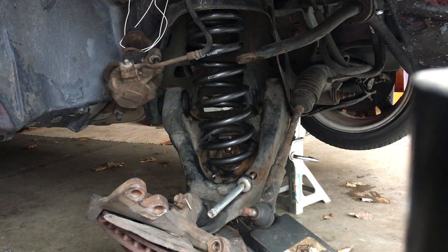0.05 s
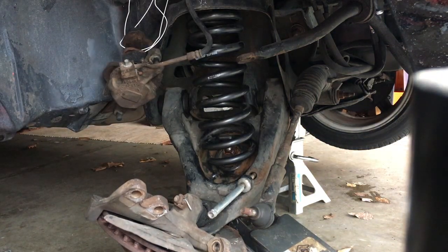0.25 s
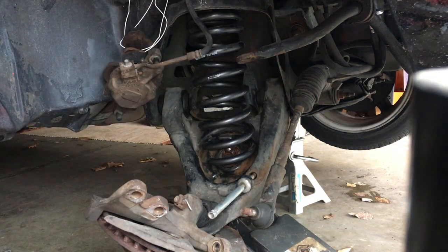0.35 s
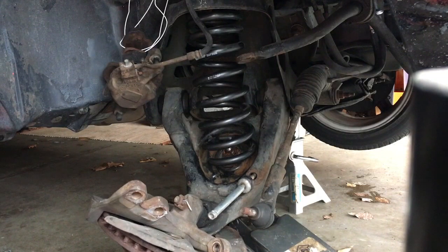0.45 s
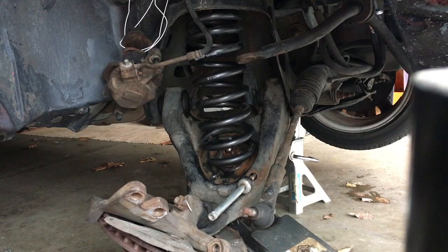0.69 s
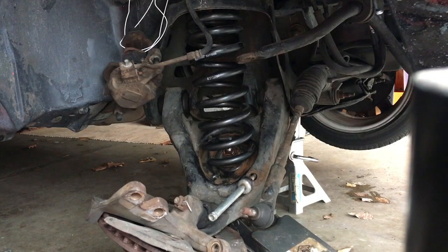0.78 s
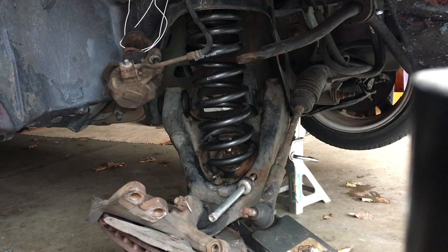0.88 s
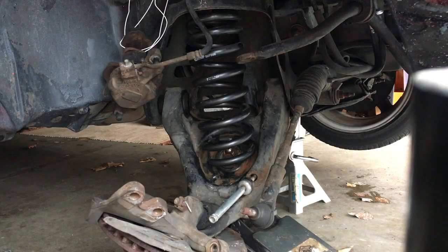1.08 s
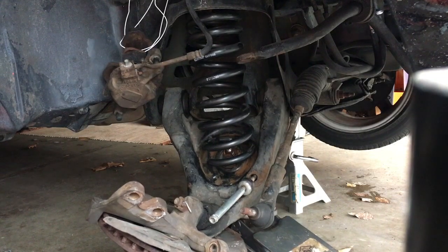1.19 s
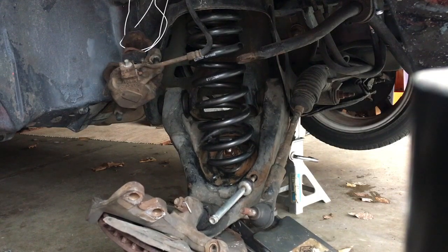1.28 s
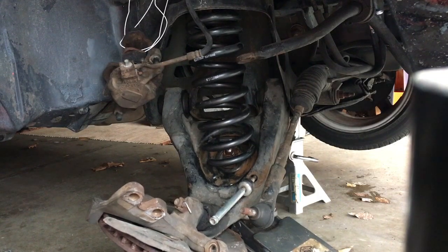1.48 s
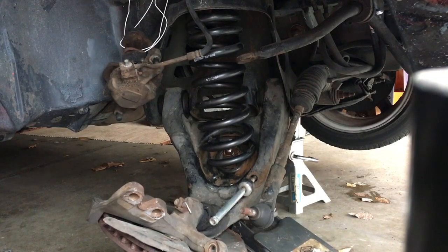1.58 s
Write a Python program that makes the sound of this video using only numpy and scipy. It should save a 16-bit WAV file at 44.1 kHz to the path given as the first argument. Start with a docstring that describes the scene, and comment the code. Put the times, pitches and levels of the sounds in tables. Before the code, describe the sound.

A steel part on a car suspension clanks sharply at about 0.15 seconds, ringing briefly in an open garage. Much softer, dull knocks follow from 1 to 1.6 seconds, the strongest near 1.2, with a faint tick near 1.4. A small bird outside gives faint rising chirps at about 0.6 and 1.25 seconds. A low motor hum and quiet room noise continue throughout.

```python
"""An open garage with a car whose suspension is under load. A steel part clanks once, ringing
from a few quick hits. Short pushes shake the suspension arm into dull knocks, and faint ticks hiss.
A small bird just outside whistles short rising chirps that echo.
A motor hums low over the steady noise of the room."""
import sys
import numpy as np
from scipy import signal
from scipy.fft import rfft, irfft, next_fast_len
from scipy.io import wavfile
from scipy.ndimage import uniform_filter1d, map_coordinates

SR = 44100
rng = np.random.default_rng(int(sys.argv[2]) if len(sys.argv) > 2 else 0)


def inscribe(sig):
    """Save sig as 16-bit PCM at rate SR to the path in sys.argv[1].

    A 1-D sig is mono; a 2-D sig holds one channel per row.
    Samples are clipped to [-1, 1] before scaling.
    """
    pcm = np.round(np.clip(np.atleast_2d(sig).T, -1, 1) * 32767)
    wavfile.write(sys.argv[1], SR, pcm.astype(np.int16))


N = 72765


def amp(db):
    """Turn decibels into a gain."""
    return 10 ** (np.asarray(db) / 20)


def unit(x):
    """Scale a signal to an average (rms) level of 1."""
    return x / np.sqrt(np.mean(x ** 2) + 1e-20)


def along(points, hz):
    """Read a curve of (pitch_hz, value) points at hz, on a log scale."""
    pitches, values = np.transpose(points)
    return np.interp(np.log(hz + 1), np.log(pitches + 1), values)


def wobble(rate):
    """A smooth curve through `rate` random points a second."""
    return map_coordinates(rng.standard_normal(int(N * rate / SR) + 4), [np.arange(N) * rate / SR])


def filtered(x, response):
    """Filter x with the gain that response gives for each frequency."""
    size = next_fast_len(len(x) + SR // 2)
    return irfft(rfft(x, size) * response(np.fft.rfftfreq(size, 1 / SR)), size)[:len(x)]


def add(track, start_s, sound):
    """Mix a sound into the track."""
    start = round(start_s * SR)
    track[start:start + len(sound)] += sound[:len(track) - start]


def burst(fade_s, response):
    """Filtered noise that starts at once. Here and below, fade_s is the time to fall by 60 dB."""
    t = np.arange(SR // 2) / SR
    return unit(filtered(rng.standard_normal(len(t)), response)) * amp(-60 * t / fade_s)


def echo_tail(fades):
    """A wash of echoes: noise that dies away as the (pitch_hz, fade_s) points say."""
    hz, t, spectrum = signal.stft(rng.standard_normal(SR), SR, nperseg=256)
    tail = signal.istft(spectrum * amp(-60 * t / along(fades, hz)[:, None]), SR, nperseg=256)[1]
    return tail / np.linalg.norm(tail)


def bird():
    """A rising whistle with a weak overtone, smeared by near and far echoes."""
    # the shape of one chirp: share_of_length, pitch_hz, level_db
    chirp_shape = [(0, 5490, -19.5), (.12, 6460, -6), (0.349, 7000, -1), (.62, 7460, -2.5), (.8, 8060, -4),
                   (0.999, 9000, -18.5)]
    # the calls: start_s, level_db, length_s, direct_db, first_third_db
    calls = [(-0.05, -51, 0.045, -3, -0.5), (0.611, -42, 0.042, 2, -0.5), (1.246, -45, .05, -6.5, -1.5)]
    share, pitch_hz, shape_db = np.transpose(chirp_shape)
    lead = SR // 10  # room for the call that begins before time zero
    out = np.zeros(N + lead)
    for start_s, level_db, length_s, direct_db, first_third_db in calls:
        progress = np.linspace(0, 1, round(length_s * SR))
        phase = 2 * np.pi * np.cumsum(np.interp(progress, share, pitch_hz)) / SR
        whistle = np.sin(phase) + amp(-11.5 - 89.5 * progress) * np.sin(2 * phase)
        opening_db = first_third_db * np.clip((0.33 - progress) * 20, 0, 1)
        loudness = amp(level_db + opening_db + np.interp(progress, share, shape_db))
        call = loudness * signal.windows.tukey(len(progress), 0.1) * whistle
        far = amp(-1.5) * echo_tail([(1000, 0.42)])
        near = amp(0.5) * echo_tail([(1000, 0.15)])
        at_s = start_s + lead / SR
        add(out, at_s, amp(direct_db) * call)
        add(out, at_s + 0.0032, signal.fftconvolve(call, far + near))
    return out[lead:]


def motor_hum():
    """A motor hums a few low, slightly unsteady tones."""
    # the motor's tones: pitch_hz, level_db
    tones = [(91.5, -58), (118.4, -62.5), (150.7, -67), (209.9, -76.5), (339.1, -78), (484.5, -82)]
    waver_db, waver_radians, wavers_per_s = 2.5, 0.3, 4.9
    out, t = np.zeros(N), np.arange(N) / SR
    for pitch_hz, level_db in tones:
        loudness = np.sqrt(2) * amp(level_db + waver_db * wobble(wavers_per_s))
        phase = 2 * np.pi * (pitch_hz * t + rng.random())
        out += loudness * np.sin(phase + waver_radians * wobble(wavers_per_s))
    return out


def room_noise():
    """A soft, deep rush with random louder and quieter patches."""
    # the tone colour of the room's noise: pitch_hz, level_db
    colour = [(15, -57), (25, -18), (50, -3.5), (70, -1.5), (97, -6), (180, -16.5), (252, -19.5),
              (392, -24.5), (443, -17.5), (609, -26), (925, -24), (1590, -28), (1890, -36), (4000, -40),
              (8870, -46), (10500, -48.5), (13500, -47.5)]
    level_db, patch_db = -58.5, 2
    spectrum = signal.stft(rng.standard_normal(N + 512), nperseg=512)[2]
    patches = uniform_filter1d(rng.standard_normal(spectrum.shape), 6, axis=0)  # smooth over pitch
    patches = uniform_filter1d(patches, 14, axis=1)  # and over time
    noise = signal.istft(spectrum * amp(patch_db * unit(patches)), nperseg=512)[1][:N]
    return amp(level_db) * unit(filtered(noise, lambda hz: amp(along(colour, hz))))


def arm_knocks():
    """Short, rough pushes make the arm ring, each in its own range of pitch."""
    # the pushes on the arm: start_s, peak_db, fade_s, centre_hz, spread_octaves
    pushes = [(0.113, -48.5, 0.068, 1680, 0.62), (0.952, -50, 0.034, 1116, 0.26),
              (0.955, -48, 0.046, 284, 0.85), (1.02, -65, 0.031, 2500, 0.66),
              (1.1932, -35, 0.042, 690, 2.36), (1.205, -46, 0.12, 3000, 1.14),
              (1.223, -52, 0.15, 1480, 0.87), (1.3, -47, 0.12, 647, 1.68),
              (1.598, -55.5, 0.085, 1230, 0.73)]
    # the tones the arm rings with: pitch_hz, width_hz, level_db
    arm_tones = [(240, 60, -5.5), (630, 77, 2), (907, 66, -5), (1056, 195, -7.5), (1630, 117, -3),
                 (1965, 110, -8.5), (2500, 340, -12), (3080, 200, -11.5), (3690, 270, -13),
                 (5000, 600, -22), (7000, 350, -8.5), (12100, 4000, -25.5)]
    rise_s, snap_db = 0.0017, 12
    out, t = np.zeros(N), np.arange(SR // 2) / SR

    def arm(hz):
        """How the arm answers a shake at each frequency."""
        return sum((-1) ** k * amp(db) * 1j * hz * width / (pitch ** 2 - hz ** 2 + 1j * hz * width)
                   for k, (pitch, width, db) in enumerate(arm_tones))

    for start_s, peak_db, fade_s, centre_hz, spread_octaves in pushes:
        rough = burst(fade_s, np.ones_like) * (1 - np.exp(-t / rise_s))
        snap = amp(snap_db) * (t == 0)
        band = lambda hz: np.exp(-(np.log2((hz + 1) / centre_hz) / spread_octaves) ** 2 / 2)
        knock = filtered(rough + snap, lambda hz: arm(hz) * band(hz))
        add(out, start_s, amp(peak_db) * knock / np.abs(knock).max())
    return out


def steel_clank():
    """Quick hits blur into one clank; each rings the steel again and adds a noisy crack."""
    # the hits on the steel: start_s, level_db, brightness_db_per_octave
    hits = [(0.1415, -24.5, 1.5), (0.1445, -19, 0.5), (0.1575, -24.5, 4.5), (0.1685, -31, 4),
            (0.1735, -33, 2.5)]
    # the tones the steel rings with: pitch_hz, level_db, fade_s
    steel_tones = [(280.3, -21, 0.051), (693, -23, 0.058), (928, -20, 0.14), (1017.4, -21, 0.15),
                   (1366, -20.5, 0.081), (1560, -9, 0.044), (1648, -5.5, 0.066), (1906, -25.5, 0.099),
                   (2960, -15, 0.055), (3110, -14.5, 0.094), (3448, -7, 0.05), (3526, -1.5, .045),
                   (3668, -3, 0.053), (3730, -1, 0.046), (3790, -3.5, 0.046), (5183, -19, 0.055)]
    # the tone colour of the crack: pitch_hz, level_db
    crack_colour = [(120, -57), (250, -23), (808, -13), (977, -12.5), (1130, -19), (1650, -3.5),
                    (2130, -23), (2600, -11), (3710, -10.5), (4300, -12.5), (8870, -33.5), (13500, -65.5)]
    rise_s, scatter_db = 0.0014, 1.5
    out, t = np.zeros(N), np.arange(SR // 2) / SR
    for start_s, hit_db, brightness in hits:
        ring = np.zeros(len(t))
        for pitch_hz, level_db, fade_s in steel_tones:
            gain = amp(level_db + brightness * np.log2(pitch_hz / 3700) + rng.normal(0, scatter_db))
            fall_db = -60 * t / fade_s
            fade = amp(fall_db) + amp(-22 + fall_db / 4.4)  # a weak part lasts 4.4 times as long
            ring += gain * fade * np.sin(2 * np.pi * pitch_hz * t)
        ring *= 1 - np.exp(-t / rise_s)
        crack = amp(-4) * burst(fade_s=0.045, response=lambda hz: amp(along(crack_colour, hz)))
        add(out, start_s, amp(hit_db) / 2 * (ring + crack))
    return out


def arm_ticks():
    """The arm ticks faintly, in tiny puffs of hiss."""
    # the ticks: start_s, level_db, fade_s
    ticks = [(0.616, -60.5, 0.069), (1.448, -51, 0.05)]
    # the tone colour of a tick: pitch_hz, level_db
    colour = [(1000, -24), (2500, 0), (4500, -10), (5300, 0), (7000, -3.5), (11000, -7.5), (13500, -12)]
    out = np.zeros(N)
    for start_s, level_db, fade_s in ticks:
        add(out, start_s, amp(level_db) / 2 * burst(fade_s, lambda hz: amp(along(colour, hz))))
    return out


def garage_echo(sound):
    """The garage throws a sound back, a little later and quieter."""
    # how long the garage echoes: pitch_hz, fade_s
    fades = [(200, 0.24), (2000, 0.29), (10000, 0.28)]
    delayed = np.pad(sound, (200, 0))  # about 4.5 ms
    return amp(-9.5) * signal.fftconvolve(delayed, echo_tail(fades))[:N]


def scene():
    """Mix the car and its echo with the bird, the motor and the room, in one channel."""
    car = steel_clank() + arm_knocks() + arm_ticks()
    return (car + garage_echo(car) + bird() + motor_hum() + room_noise())[None]


def record(dry):
    """Cut off the very highest treble."""
    top_hz = 13450
    return filtered(dry[0], lambda hz: hz < top_hz)[None]


dry = scene()
out = record(dry)
inscribe(out)
```